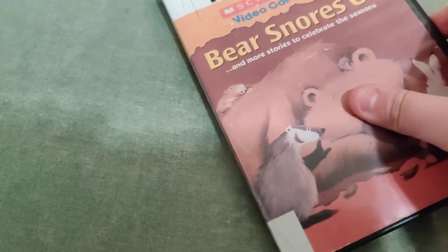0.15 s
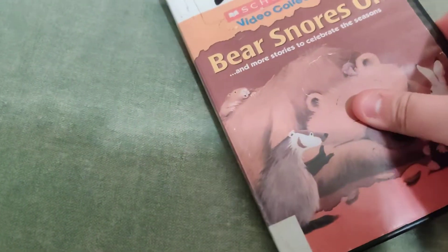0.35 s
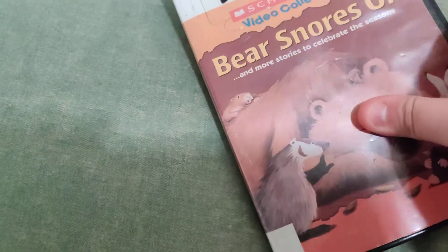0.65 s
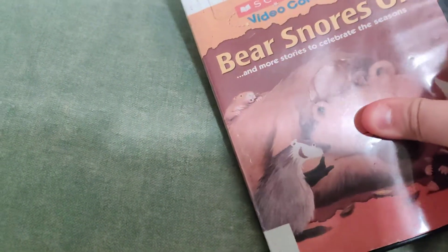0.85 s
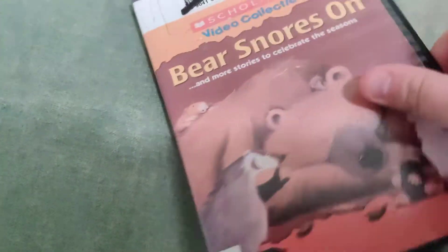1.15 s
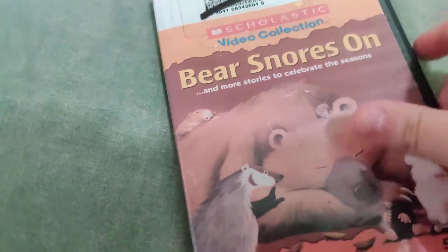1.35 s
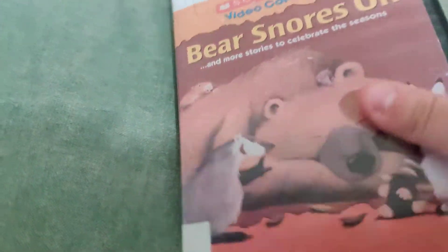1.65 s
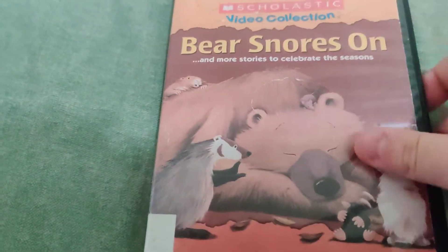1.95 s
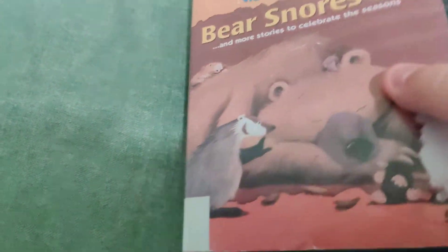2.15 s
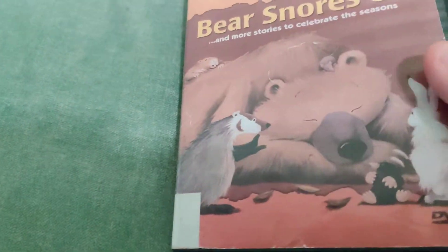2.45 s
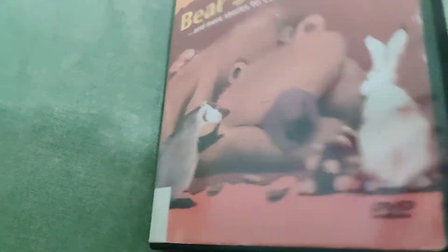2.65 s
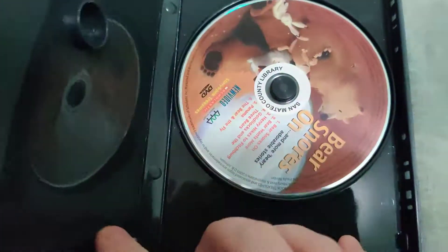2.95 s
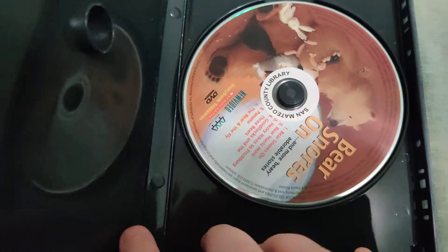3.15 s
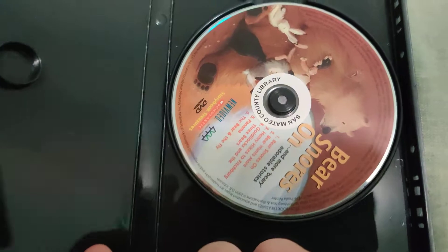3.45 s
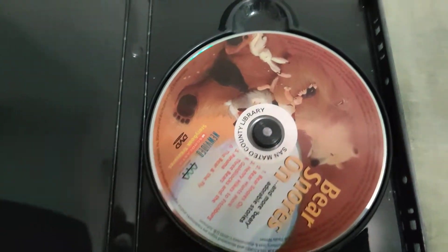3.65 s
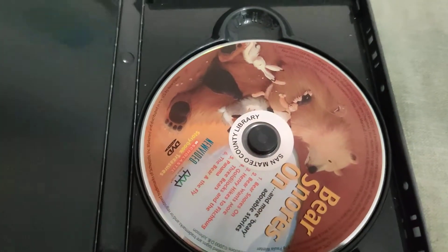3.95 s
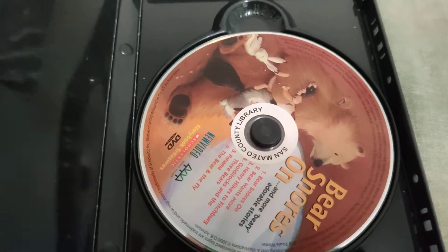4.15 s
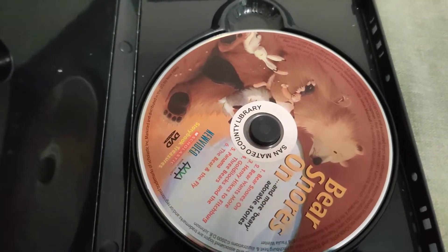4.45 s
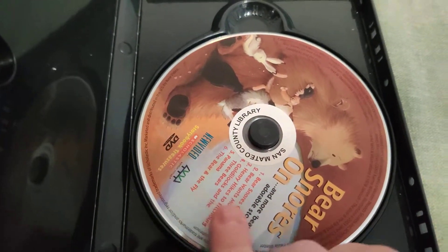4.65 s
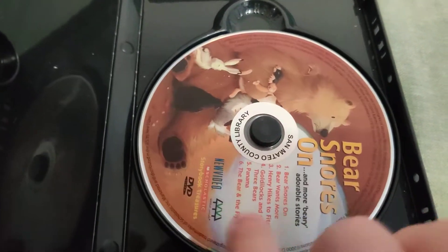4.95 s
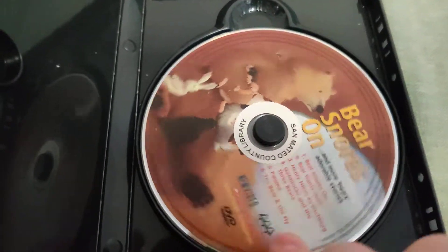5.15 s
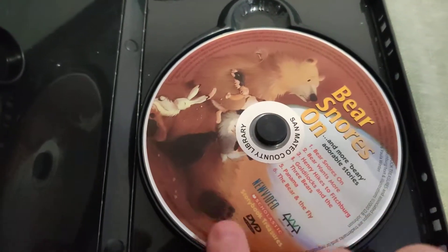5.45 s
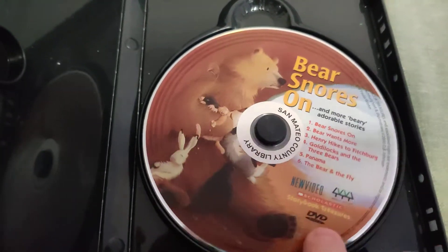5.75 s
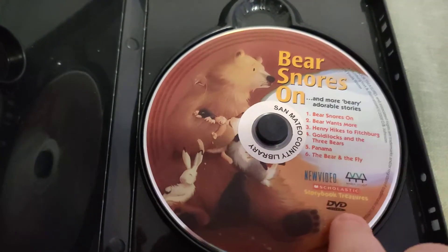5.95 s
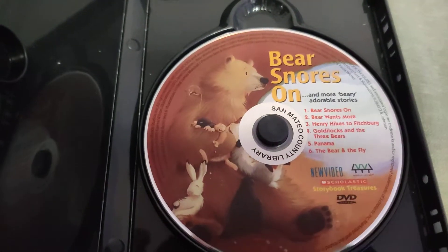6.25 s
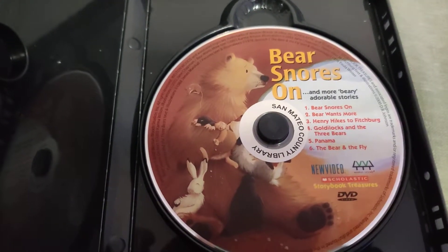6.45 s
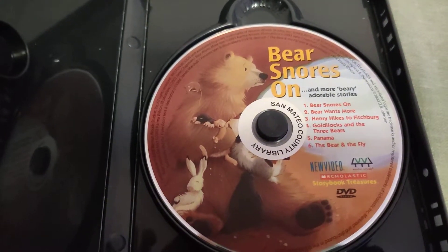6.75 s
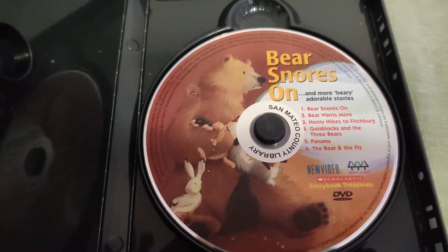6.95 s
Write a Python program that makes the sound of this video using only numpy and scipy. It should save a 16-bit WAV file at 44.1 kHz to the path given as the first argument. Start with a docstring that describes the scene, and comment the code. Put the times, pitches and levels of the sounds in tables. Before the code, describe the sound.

Very close stereo microphone in a small quiet furnished room. Faint rubs and dull knocks of a plastic disc case come first, then a violent cluster of snaps and creaks as its catches let go. Looser clatter and sleeve rubbing fade into a near-silent gap with a soft cloth drag. Finally a finger pushes the disc round in uneven strokes, with bright clacks and short scrapes.

```python
"""In a small room, a plastic disc case is turned in the hand over a cloth seat, close to a stereo microphone.
Its catches creak and snap apart: noise bursts and sharp pulses ring through plastic resonances, panels pop.
The cover is folded back with rubs and ticks of the sleeve, and drags over the cloth as a run of rib ticks.
Then a finger pushes the disc round its hub in short strokes: it clacks and scrapes in the tray.
Low handling rumble, quiet room noise, a thin band of hiss and microphone noise lie underneath."""
import sys
import numpy as np
from scipy import signal
from scipy.fft import rfft, irfft
from scipy.io import wavfile

SR = 44100
rng = np.random.default_rng(int(sys.argv[2]) if len(sys.argv) > 2 else 0)


def transcribe(u):
    """Save the signal u as a 16-bit wav file named by the first command-line argument.

    u: samples, shape (n,) or (channels, n), limited to [-1, 1]; the rate is SR.
    q: integer samples, one column per channel.
    """
    v = np.clip(np.atleast_2d(u).T, -1, 1)
    q = np.round(v * 32767).astype(np.int16)
    wavfile.write(sys.argv[1], SR, q)


N = 313110

CUTOFF_HZ = 16000
RUB_PEAK_SHARE, RUB_ROUNDNESS = 0.58, 0.92  # where in its length a rub is strongest, and how it tapers

# Sleeve and fingers rubbing on the shell, levels before the mix trims.
# Each row: start in seconds, length in seconds, rub level in dB, hiss level in dB.
CASE_RUBS = [(-.05, 0.34, -57.5, -76), (0.355, 0.19, -62.5, -89), (0.623, 0.19, -70, -95),
             (0.998, 0.18, -40, -50), (1.159, .13, -53, -69), (1.328, .25, -56, -74),
             (1.599, 0.31, -51.5, -75), (1.92, 0.22, -63, -91), (2.118, 0.14, -68, -79),
             (2.297, 0.25, -64, -77.5), (2.655, 0.088, -65.5, -73.5), (2.898, 0.23, -71, -68)]
# Broad colour of the fine hiss of sleeve and fingertip. Each row: frequency in Hz, relative level in dB.
HISS_COLOUR = [(1500, -26), (2800, -4.5), (4000, 1), (4800, 10), (6200, -3.5), (9000, -5.5), (12000, -8),
               (15500, -6.5)]


def case():
    """The plastic shell knocks, snaps open and rubs under its sleeve, with a short room tail."""
    # Broad colour of the shell. Each row: frequency in Hz, relative level in dB.
    case_colour = [(60, -3.5), (240, -6), (380, -10), (480, -9), (650, -2.5), (1100, -7.5), (1500, -9),
                   (1800, -8.5), (2250, -11.5), (3000, -11.5), (3700, -19.5), (5100, -20.5), (6500, -28.5),
                   (10000, -34.5), (15000, -45)]
    # Resonances of the shell. Each row: frequency in Hz, width in Hz, relative level in dB.
    case_modes = [(601.8, 39, -1), (953, 66, -6.5), (1620, 70, -15), (1695, 78, -8), (2030, 46, -8.5),
                  (2570, 74, -14.5), (3190, 55, -9.5), (3480, 62, -24.5), (3720, 21, -13),
                  (4850, 300, -9.5), (5370, 34, -19.5), (5170, 31, -10), (5610, 15, -26), (5980, 17, -22.5),
                  (7170, 100, -23)]
    knocks = contacts(
        case_touches(), case_colour, case_modes,
        crack_db=-10.5, swell=0.025, vary_db=3.5, detune=0.012, alike=0.88, late_s=0.00012, window_s=0.014,
        trims_db=[-3.0, -2.0, -3.0, 0.0, -10.5], shadows=[0.42, 2.1, 0.34, 3.0, 0.05])

    rub, hiss = strokes(CASE_RUBS, RUB_PEAK_SHARE, RUB_ROUNDNESS)
    shell_slips = friction(response(case_colour, case_modes), slips_per_s=330, spread_db=1.5,
                           smooth_db=0.0, low_hz=150, alike=0.6)
    rubbing = from_db(-4.5) * rub * shell_slips
    sleeve_slips = friction(response(HISS_COLOUR), slips_per_s=1400, spread_db=0.5,
                            smooth_db=3.0, low_hz=2000, alike=0.96)
    sleeve = from_db(0.5) * hiss * sleeve_slips

    shell = arriving(damped_notes() + rubbing * panned(10.0), left_late_s=0.00008)
    dry = knocks + catches() + shell + sleeve * panned(1.5)
    return dry + from_db(-16.0) * room(dry, t60=0.33, treble_t60=0.11) * panned(5.0)


def case_touches():
    """Knocks and sleeve ticks as contacts: a harder touch has more clack and more edge."""
    # Knocks and cracks of the shell, levels before the range trims.
    # Each row: start in seconds, level of 350-1800 Hz in dB, thump in dB relative to it,
    # hardness as treble in dB relative to it, left-right difference in dB before shading,
    # 60 dB decay of the scuff in seconds.
    case_knocks = [(.02, -43.5, -10.5, -11.5, 4.5, 0.018), (0.053, -80, 2, 10, 12, .03),
                   (.097, -66, -3, 8, 14, 0.038), (.1125, -52, -10, -24, 2, 0.017),
                   (.175, -55, -2.5, -1, 1, .05), (0.263, -56, -8, -24, 3, 0.07),
                   (.32, -59, -18, -31, 1.5, 0.023), (.382, -53, -11, -3, 2, 0.045),
                   (0.462, -50.5, -2, -2.5, 3.5, 0.061), (.612, -49, -4, 3, 13, 0.0095),
                   (.883, -54, -20, 5, 9, 0.013), (.915, -58.5, -22, 3, 5, 0.013),
                   (0.9987, -25, 0, -4, 4, 0.03), (1.0096, -32.5, 0, 4.5, 33, .055),
                   (1.019, -50, -17, 1, 2, 0.028), (1.034, -35.5, -20, 1, -1, 0.024),
                   (1.042, -34, -20, 2, 10, .025), (1.046, -30, -1, 3.5, 38, 0.043),
                   (1.0534, -25.5, -5.5, 5.5, 7, .032), (1.069, -22, -15, -6, -1.5, .009),
                   (1.075, -26.5, -2.5, 5, 1, .036), (1.085, -28, -3, 4, -4, 0.031),
                   (1.097, -31.5, -8, 3.5, -1.5, 0.041), (1.123, -36, -7, 7, -19, .027),
                   (1.166, -34.5, -18, -1, 1, 0.065), (1.174, -36, -20, -1, 32, 0.092),
                   (1.189, -43.5, -17, 6.5, 15, 0.054), (1.211, -53, -10, 10, 23, 0.028),
                   (1.246, -39.5, -25, -19, 0.5, 0.023), (1.26, -51.5, -20, 3, 30, 0.054),
                   (1.31, -54, -15, 7, 13, 0.015), (1.329, -46, -2.5, 3, -7, 0.021),
                   (1.335, -38, -7.5, 5, 6, 0.076), (1.377, -45, -14, -2, 1.5, 0.09),
                   (1.405, -46, -10, 0, 6, .066), (1.661, -51.5, -21, -6, 2, .065),
                   (1.717, -48, -23, 2.5, 1.5, .03), (1.752, -40.5, -2, 2, 9, 0.015),
                   (1.805, -40.5, -5, -0.5, 5, 0.11), (1.839, -39.5, -12, 6.5, 2, 0.052),
                   (1.846, -42.5, -1.5, 1.5, 0, 0.044), (1.942, -56.5, 1, 7.5, 2, 0.043),
                   (1.964, -55, -6, -4, 5, 0.015), (1.991, -54, -8, 0, 3, 0.025),
                   (2.01, -55.5, -11, -1.5, 4, 0.047), (2.215, -58.5, -3.5, -21, 1, 0.036),
                   (2.251, -62, -1, -16, 4, .02), (2.442, -62.5, 9, 2, 18, .036),
                   (2.566, -53.5, -14, -0.5, 4.5, 0.019), (2.708, -57, 3, 1, 5, .03),
                   (3.801, -64, 4, 7, 18, 0.015), (3.854, -64.5, -3.5, 7.5, 17, 0.0077),
                   (4.42, -71, 4, 7, 17, 0.03), (4.553, -72.5, 6.5, 1.5, 11.5, 0.012)]
    edge_db = -8  # added to the hardness for the topmost ranges
    return [(s, db, thump_db, hard_db, edge_db + hard_db, pan_db, t60)
            for s, db, thump_db, hard_db, pan_db, t60 in [*case_knocks, *sleeve_ticks(count=6)]]


def sleeve_ticks(count):
    """The sleeve catches a few times through each rub, loudest towards the middle and in a stronger rub."""
    tick_db, spread_db = 0.5, 1.5  # level against the rub, and its spread
    thump_db, hardness_db, pan_db, t60_s = -2.5, 1, 11.0, 0.014
    ticks = []
    for s, length, rub_db, _ in CASE_RUBS:
        shares = (np.arange(count) + 1 + rng.uniform(-0.5, 0.45, count)) / (count + 1)
        for share, chance in zip(shares, rng.normal(size=count)):
            middle_db = 20 * np.log10(np.sin(np.pi * share))
            level_db = rub_db + tick_db + spread_db * chance + middle_db
            ticks.append((max(s + share * length, 0), level_db, thump_db, hardness_db, pan_db, t60_s))
    return ticks


def catches():
    """A catch jumps over its ridge: one N-shaped pulse that rings briefly in the stiff rim."""
    # Catches letting go with one sharp crack.
    # Each row: time in seconds, peak in dB, pulse width in seconds, left-right difference in dB.
    catch_snaps = [(0.6113, -30, .00005, 10), (1.0699, -5.5, 0.000054, 2), (1.0767, -13.5, .00005, -1)]
    out, t = np.zeros((2, N)), np.arange(N) / SR
    rim = response([(300, -9), (1200, -2), (2200, -9), (3200, -4), (4000, -9.5), (5000, 0),
                    (6500, -18.0), (15000, -19)], size=512)
    for s, peak_db, width_s, pan_db in catch_snaps:
        u = np.clip((t - s) / width_s, -8, 8)
        pulse = u * np.exp(-u ** 2)
        crack = through(pulse[None], rim)
        out += crack / np.max(np.abs(crack)) * from_db(peak_db) * panned(pan_db)
    return out


def damped_notes():
    """A flexing panel, or the cushion bouncing under the case, swings as one damped note."""
    # Panels that flex and ring, and the cushion bouncing under the case (the 22 Hz row). # Each row: start in
    # seconds, frequency in Hz, starting level in dB, 60 dB decay in seconds.
    pops = [(.020, 630, -48, 0.12), (.112, 650, -43, 0.02), (.612, 650, -41.5, 0.029),
            (0.9983, 172, -19, 0.058), (1.051, 115, -25.5, 0.13), (1.067, 67.8, -25, 0.15),
            (1.0697, 950, -20, .035), (1.073, 248.6, -27.5, 0.039), (1.076, 81, -30.5, .1),
            (1.101, 22, -26.5, 0.66), (1.166, 736, -29.5, 0.052), (1.7526, 990, -25.5, 0.028),
            (2.441, 176, -41.5, 0.073)]
    out = np.zeros(N)
    for s, hz, db, t60 in pops:
        at = round(s * SR)
        t = np.arange(min(N - at, SR)) / SR
        out[at:at + len(t)] += np.sin(2 * np.pi * hz * t) * from_db(db - 60 * t / t60)
    return out * panned(1.3)


def far_port(x):
    """The right port faces away from the case and hears it with two dips."""
    # Colour of the far port. Each row: frequency in Hz, gain in dB.
    port_colour = [(1000, 2.5), (1400, 1), (1900, -4.5), (2300, -5.5), (2800, -2.5), (3200, -3.5),
                   (3900, -2), (4400, -7), (5100, -0.5), (6500, 3), (12000, -0.5)]
    return np.array([x[0], through(x[1:], response(port_colour, size=512))[0]])


def disc():
    """The disc rocks on its hub and scrapes round in the tray under a pushing finger."""
    # Broad colour of disc and tray. Each row: frequency in Hz, relative level in dB.
    disc_colour = [(80, -20), (230, -8.5), (340, -22), (650, -1.5), (900, -19), (1550, -16), (2400, -5.5),
                   (3100, -14), (3600, -35), (5100, -10), (6100, -33), (7500, -30.5), (15000, -43)]
    # Resonances of disc and tray. Each row: frequency in Hz, width in Hz, relative level in dB.
    disc_modes = [(428, 67, -9.5), (638, 22, -1.5), (996, 136, -7.5), (1271, 88, -3), (1727, 94, -9),
                  (2243, 63, -0.5), (2610, 125, 0.5), (3290, 190, -5.5), (3990, 184, -8.5), (4350, 70, -17),
                  (4694, 100, -5.5), (5000, 220, -8.5), (5510, 100, -33), (5800, 66, -18.5),
                  (6660, 120, -23)]
    # Pushes that slide the disc round, levels before the mix trims.
    # Each row: start in seconds, length in seconds, scrape level in dB, hiss level in dB.
    disc_pushes = [(4.76, 0.13, -52.5, -62.5), (4.87, 0.073, -52, -66), (5.15, .1, -48.5, -55),
                   (5.24, 0.069, -70, -71), (5.59, 0.11, -47.5, -57), (5.79, 0.094, -57, -78.5),
                   (5.85, 0.15, -60.5, -83), (6.01, 0.14, -62.5, -90), (6.289, 0.042, -65, -63)]
    clacks = contacts(
        disc_touches(count=3), disc_colour, disc_modes,
        crack_db=-8.0, swell=0.023, vary_db=4.5, detune=0.012, alike=0.91, late_s=-0.0000067, window_s=0.012,
        trims_db=[0.0, -1.9, -1.5, -1.8, -12.5], shadows=[0.64, 0.98, 1.39, 1.2, 0.22])

    scrape, hiss = strokes(disc_pushes, peak_share=0.65, roundness=1.26)
    # the pressing finger damps the disc while it slides, and fine slips favour the upper resonances
    damped = [(hz, width * 1.25, db + 6.0 * np.log2(hz / 2700)) for hz, width, db in disc_modes]
    slipping = friction(response(disc_colour, damped), slips_per_s=3500, spread_db=4.5,
                        smooth_db=2.5, low_hz=1384, alike=0.56)
    scraping = from_db(-1.5) * scrape * slipping
    finger_slips = friction(response(HISS_COLOUR), slips_per_s=1900, spread_db=2.0,
                            smooth_db=8.0, low_hz=1967, alike=0.21)
    fingertip = from_db(-1.5) * hiss * finger_slips

    dry = round_the_body(clacks + scraping * panned(16.2), late_s=0.00016) + fingertip * panned(3.4)
    return dry + from_db(-22.5) * room(dry, t60=0.3, treble_t60=0.3) * panned(0.96)


def disc_touches(count):
    """Each clack as contacts: the rim grazes the tray, then come the main hit and weakening bounces."""
    # The disc tipping against hub and tray, levels before the range trims.
    # Each row: start in seconds, level of 350-1800 Hz in dB, hardness as treble in dB relative to it,
    # 60 dB decay of the scuff in seconds.
    disc_clacks = [(4.7302, -39.5, 10, 0.018), (4.783, -53.5, -13, 0.028), (4.87, -56, -18, 0.011),
                   (4.883, -55.5, 6, .01), (4.891, -48, 12.5, 0.026), (4.923, -56, 12, 0.011),
                   (4.963, -51.5, 7, 0.0073), (5.001, -63.5, 7.5, 0.018), (5.112, -38, 6, 0.036),
                   (5.217, -44, -4, 0.013), (5.252, -58.5, 11, 0.0048), (5.261, -47.5, 13, 0.01),
                   (5.303, -49.5, 3, .015), (5.316, -47.5, -0.5, 0.012), (5.5416, -38, 11, 0.02),
                   (5.5634, -46, 3.5, 0.02), (5.659, -50.5, -12, 0.018), (5.673, -63, 13, 0.015),
                   (5.704, -57, 13, .008), (5.716, -47.5, 11, 0.018), (5.747, -55, 6, 0.013),
                   (6.148, -51.5, 6.5, 0.011), (6.164, -55.5, 5, 0.054), (6.292, -54.5, 6.5, 0.0096),
                   (6.308, -54.5, 2, 0.047), (6.321, -53, 2.5, 0.029), (6.347, -65, 5.5, .019)]
    thump_db, edge_db, pan_db = -6.5, -6.5, 11.0  # shared by all clacks
    graze_lead_s, graze_db, graze_pan_db = 0.0035, -3.0, 12.5
    firm_clack_db = -44  # below this level the graze fades twice as fast as its clack
    bounce_s, bounce_db, bounce_dulls_db = 0.014, -7.5, -2
    touches = []
    for s, db, hard_db, t60 in disc_clacks:
        level_db = db + graze_db + min(db - firm_clack_db, 0)
        touches.append((s - graze_lead_s, level_db, thump_db, hard_db, hard_db + edge_db, graze_pan_db, t60))
        for k in range(count):
            treble_db = hard_db + k * bounce_dulls_db
            touches.append((s, db + k * bounce_db, thump_db, treble_db, treble_db + edge_db, pan_db, t60))
            s += bounce_s * (1 + 0.12 * rng.normal())
    return touches


def cloth_drag():
    """The edge of the open cover trips over one rib of the cloth after another, over a soft swish."""
    # Drags over the cloth.
    # Each row: start in seconds, length in seconds, rib tick level in dB, smooth friction level in dB.
    drags = [(3.46, 0.26, -54, -64.5), (3.69, 0.16, -65, -71)]
    # Broad colour of cover and cloth. Each row: frequency in Hz, relative level in dB.
    drag_colour = [(60, -12.5), (130, -1.5), (360, -12.5), (500, -10), (1130, -20.5), (1700, -13),
                   (2480, -15.5), (3980, -25), (4930, -16), (6240, -34.5), (8800, -31), (15000, -44)]
    ribs_per_s, rib_spread_db = 115, 3
    ribs, swish = strokes(drags, peak_share=0.59, roundness=0.84)
    gaps = (1 + 0.2 * rng.normal(size=round(N / SR * 200)).clip(-3, 3)) / ribs_per_s
    at = (np.cumsum(gaps) * SR).astype(int)
    sizes = from_db(rib_spread_db * rng.normal(size=len(at)))
    trips = np.zeros(N)
    trips[at[at < N]] = sizes[at < N]
    body = response(drag_colour, [(4920, 260, -10.5)])
    ticks = rms_one(through(trips + 0.043 * stereo_noise(N, 0.39), body))
    smooth = rms_one(through(stereo_noise(N, 0.97), body))
    return round_the_body(ribs * ticks + swish * smooth, late_s=0.00017) * panned(12.0)


def contacts(rows, colour, modes, crack_db, swell, vary_db, detune, alike, late_s, window_s,
             trims_db, shadows, size=4096):
    """Each contact is a sharp crack and a dying scuff of micro-slips that set the plastic ringing."""
    # Edges in Hz of the thump, body, clack, edge and air ranges, one after another.
    band_edges = [70, 350, 1800, 4000, 5700, 15000]
    out, t = np.zeros((2, N + size)), np.arange(size) / SR
    filters = [signal.butter(3, edges, "band", fs=SR, output="sos")
               for edges in zip(band_edges, band_edges[1:])]
    early = np.exp(-(t / window_s) ** 2)
    for s, level_db, thump_db, clack_db, edge_db, pan_db, scuff_t60 in rows:
        # long scuffs also take longer to build up
        shape = from_db(-60 * t / scuff_t60) * (1 - np.exp(-t / (scuff_t60 * swell)))
        force = stereo_noise(size, alike) * from_db(3.4 * rng.standard_normal(size)) * shape
        force /= np.sqrt(np.sum(force ** 2) / 2)
        force[:, 8] -= from_db(crack_db)
        # the grip bends and damps the plastic, so the modes differ from touch to touch
        gripped = [(hz * (1 + detune * rng.normal()), width, db + vary_db * rng.normal())
                   for hz, width, db in modes]
        ringing = through(force, response(colour, gripped, size=size))
        sound = arriving(ringing, late_s + 0.00005 * rng.normal())
        at = round(s * SR)
        # spot and hardness of the touch weight its ranges; each range has its own share of the panning
        tones_db = [thump_db, 0, clack_db, edge_db, edge_db]
        for sos, tone_db, trim_db, shade in zip(filters, tones_db, trims_db, shadows):
            part = signal.sosfilt(sos, sound)
            early_energy = np.sum(part ** 2 * early, axis=1, keepdims=True)
            early_rms = np.sqrt(early_energy / (0.01 * SR))  # as if spread over 10 ms
            gain = from_db(level_db + tone_db + trim_db) * panned(pan_db * shade)
            out[:, at:at + size] += part / early_rms * gain
    return out[:, :N]


def strokes(rows, peak_share, roundness):
    """Each stroke of the hand speeds up and slows to a stop; gives the gains of its friction and its hiss."""
    t, gains = np.arange(N) / SR, np.zeros((2, N))
    for s, length, level_db, hiss_db in rows:
        phase = np.interp(t, [s, s + length * peak_share, s + length], [0, 1, 0])
        moving = phase > 0
        speed = np.sin(phase[moving] * np.pi / 2) ** roundness
        gains[:, moving] += from_db([[level_db], [hiss_db]]) * speed
    return gains


def friction(body, slips_per_s, spread_db, smooth_db, low_hz, alike):
    """Tiny slips of uneven size over a smooth hiss, sounding through the given body; rms 1."""
    slips = (rng.random(N) < slips_per_s / SR) * rng.choice([-1, 1], N)
    sizes = from_db(spread_db * np.minimum(rng.exponential(1, N), 4))
    rough = rms_one(slips * sizes * stereo_noise(N, alike))
    force = rough + from_db(smooth_db) * stereo_noise(N, alike)
    return rms_one(band(through(force, body), low_hz, CUTOFF_HZ))


def arriving(x, left_late_s):
    """The sound reaches the two microphone ports at slightly different times."""
    t = np.arange(x.shape[1]) / SR
    left = np.interp(t - left_late_s / 2, t, x[0], left=0)
    right = np.interp(t + left_late_s / 2, t, x[1], left=0)
    return np.array([left, right])


def round_the_body(x, late_s):
    """Lows bend round the microphone's body and reach the right port late; treble is delayed less."""
    a = (late_s * SR - 1) / (late_s * SR + 1)  # first-order all-pass
    return np.array([x[0], signal.lfilter([-a, 1], [1, -a], x[1])])


def room(x, t60, treble_t60, size=26000):
    """Dense reflections of a small furnished room; lows and treble each have their own decay."""
    t = np.arange(size) / SR
    noise = stereo_noise(size, 0.54) * np.clip((t - 0.004) / 0.0027, 0, 1)
    lows = band(noise, 60, 2300) * from_db(-60 * t / t60)
    treble = band(noise, 3600, 11000) * from_db(-60 * t / treble_t60)
    tail = lows + treble
    return through(x, tail / np.sqrt(np.sum(tail ** 2) / 2))


def background():
    """Handling rumble, the quiet room, a thin band of hiss near 5 kHz and the microphones' own noise."""
    # Low rumble under everything, before a lift of 2.5 dB. Each row: time in seconds, level in dB.
    rumble_rest = [(0.0, -60), (0.85, -66.5), (1.22, -46), (1.5, -62.5), (3.6, -66), (4.23, -62),
                   (5.85, -65), (7.1, -69)]
    # Colours of rumble and room. Each row: frequency in Hz, relative level in dB.
    rumble_colour = [(12, -10), (25, -4.5), (40, -2.5), (60, -5), (110, -16.5), (200, -26), (400, -38),
                     (1000, -74.5)]
    floor_colour = [(100, -5), (170, -1), (250, -12), (340, -5.5), (480, -12), (1000, -15), (1700, -19.5),
                    (2600, -14.5), (3100, -21.5), (3500, -18.5), (4200, -21.5), (5300, -20), (6000, -36.5),
                    (15000, -50)]
    # Resonance of the thin hiss. Each row: frequency in Hz, width in Hz, relative level in dB.
    thin_band = [(4920, 190, 0.0037)]
    rub, _ = strokes(CASE_RUBS, RUB_PEAK_SHARE, RUB_ROUNDNESS)
    t = np.arange(N) / SR
    rest = from_db(np.interp(t, *np.transpose(rumble_rest)) + 2.5)
    # the cushion rumbles more, 30 ms late, with every rub of the case
    press = np.hypot(rest, from_db(-2) * np.interp(t - 0.03, t, rub))
    rumble = press * rms_one(through(stereo_noise(N, 0.7), response(rumble_colour)))

    room_noise = through(stereo_noise(N, 0.68), response(floor_colour))
    floor = from_db(-71.5) * rms_one(band(room_noise, 80, CUTOFF_HZ))
    thin_noise = through(stereo_noise(N, 0.3), response([(100, -39.5), (15000, -42.5)], thin_band))
    thin_hiss = from_db(-78) * rms_one(thin_noise)
    mic_hiss = from_db(-78.5) * rms_one(band(rng.standard_normal((2, N)), 7600, 21000))
    return rumble * panned(6.1) + floor * panned(6.5) + thin_hiss * panned(4.2) + mic_hiss


def from_db(db):
    """Decibels to gain."""
    return 10 ** (np.asarray(db) / 20)


def rms_one(x):
    """Scale to rms 1."""
    return x / np.sqrt(np.mean(x ** 2) + 1e-20)


def panned(db):
    """Left and right gains for a level difference, at constant power."""
    return rms_one(from_db([[db / 2], [-db / 2]]))


def stereo_noise(size, alike):
    """White noise that is partly shared by the two channels."""
    shared = rng.standard_normal(size)
    own = rng.standard_normal((2, size))
    return np.sqrt(alike) * shared + np.sqrt(1 - alike) * own


def band(x, low_hz, high_hz):
    """Causal band-pass."""
    sos = signal.butter(3, [low_hz, min(high_hz, 0.45 * SR)], "band", fs=SR, output="sos")
    return signal.sosfilt(sos, x)


def response(colour, modes=(), size=8192):
    """Causal (minimum-phase) impulse response of a broad colour with resonances standing out of it."""
    hz = np.maximum(np.arange(size // 2 + 1) * SR / size, 1)
    points = np.array(colour)
    power = from_db(np.interp(np.log(hz), np.log(points[:, 0]), points[:, 1])) ** 2
    for centre, width, db in modes:
        power = power + from_db(db) ** 2 / (1 + ((hz - centre) / width) ** 2 * 2) ** 2
    # folding the cepstrum forward in time gives minimum phase
    cepstrum = irfft(np.log(power) / 2)
    cepstrum[1:size // 2] *= 2
    cepstrum[size // 2 + 1:] = 0
    return irfft(np.exp(rfft(cepstrum)))[None, :size // 2]


def through(x, impulse_response):
    """Filter a signal along time, keeping its length."""
    return signal.fftconvolve(x, impulse_response, axes=1)[:, :x.shape[1]]


def scene():
    """Case, cloth, disc and background together."""
    return far_port(case()) + cloth_drag() + disc() + background()


def record(dry):
    """The lowest rumble and the top are cut."""
    dry = signal.sosfilt(signal.butter(2, 14, "high", fs=SR, output="sos"), dry)
    return signal.sosfilt(signal.ellip(10, 0.1, 80, CUTOFF_HZ, fs=SR, output="sos"), dry)


dry = scene()
out = record(dry)
transcribe(out)
```